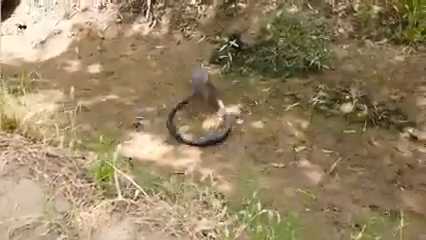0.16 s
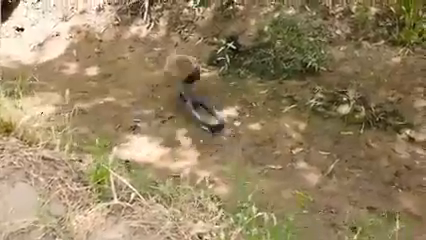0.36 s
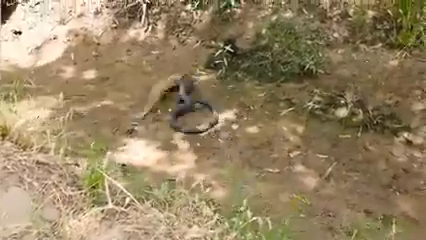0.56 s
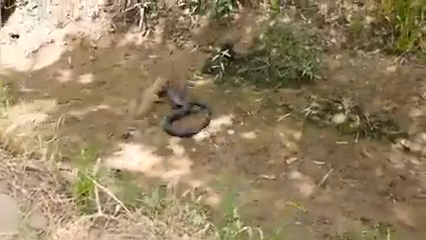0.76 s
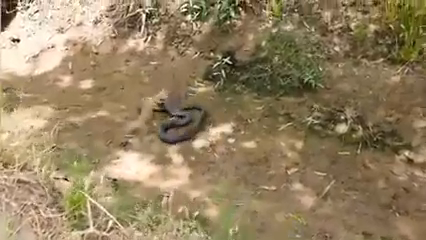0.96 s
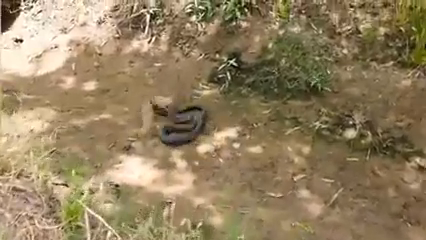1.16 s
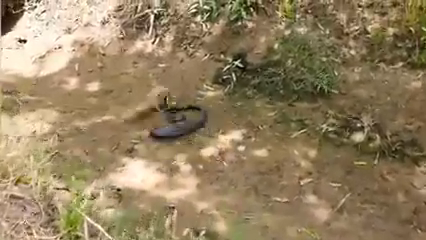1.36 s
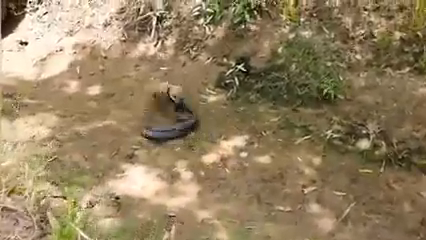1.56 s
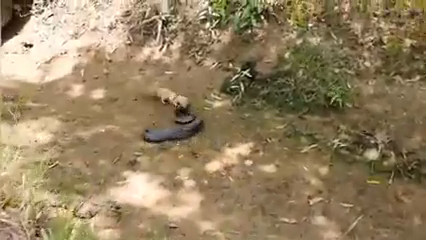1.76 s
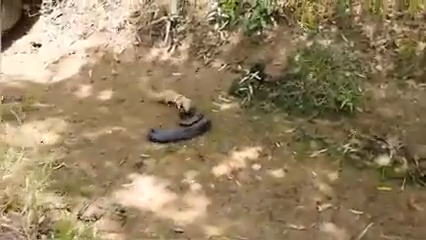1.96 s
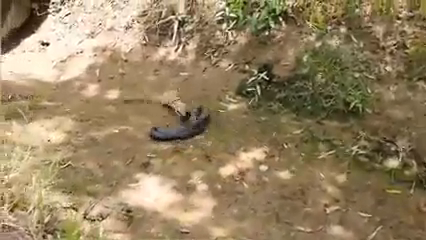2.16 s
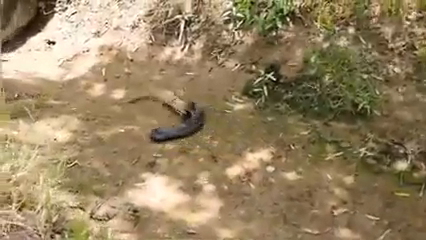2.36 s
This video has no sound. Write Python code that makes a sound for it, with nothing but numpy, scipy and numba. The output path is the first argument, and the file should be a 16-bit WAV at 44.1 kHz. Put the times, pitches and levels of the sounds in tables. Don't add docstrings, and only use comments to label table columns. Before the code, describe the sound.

Three forceful snake hisses, one sharp, one swelling, one long, over soft bumps, rustle and low wind

```python
import sys
import numpy as np
from scipy import signal
from scipy.fft import rfft, irfft
from scipy.io import wavfile
from scipy.ndimage import uniform_filter1d
from numba import njit

SR = 44100
rng = np.random.default_rng(int(sys.argv[2]) if len(sys.argv) > 2 else 0)


def field_ratio(decibels):
    return 10 ** (np.asarray(decibels, dtype=float) / 20)


def persist_wave(psi):
    counts = np.round(np.clip(psi, -1, 1) * 32767).astype(np.int16)
    wavfile.write(sys.argv[1], SR, np.atleast_2d(counts).T)


N = 112455


def unit(x):
    return x / np.sqrt(np.mean(x ** 2))


def curve(table, column=1):
    table = np.array(table)
    return np.interp(np.arange(N) / SR, table[:, 0], table[:, column])


def spectrum(table):
    table = np.array(table)
    hz = np.arange(N // 2 + 1) * SR / N
    return np.interp(np.log(hz + 1), np.log(table[:, 0]), table[:, 1])


def cut(x, hz, kind, order=6):
    return signal.sosfilt(signal.butter(order, hz, kind, fs=SR, output="sos"), x)


@njit
def svf(x, hz, width):
    y, b, l = np.empty(len(x)), 0., 0.
    for i in range(len(x)):
        g, k = np.tan(np.pi * hz[i] / SR), width / hz[i]
        v = (b + g * (x[i] - l)) / (1 + g * (g + k))
        b, l, y[i] = 2 * v - b, l + 2 * g * v, k * v
    return y


def resonance(hz, width_hz, size=N):
    hz = np.clip(hz * np.ones(size), 20, .42 * SR)
    once = svf(rng.standard_normal(size), hz, 1. * width_hz)
    return svf(once, hz, 1.5 * width_hz)


def band(hz, width_hz):
    return resonance(hz, width_hz) / np.sqrt(width_hz / SR)


def walk(rate_hz):
    k = int(SR / rate_hz)
    steps = np.repeat(rng.standard_normal(1500), k)[:N]
    return unit(uniform_filter1d(uniform_filter1d(steps, k), k))


# start_s, level_db, length_s, left_right_db
GUSTS = [(0, -35.5, 0.012, -4), (0.551, -40, 0.024, -6), (0.759, -48.5, 0.027, -13.5),
         (1.688, -34.5, 0.028, -28), (1.76, -40.5, 0.058, -25), (1.864, -22.5, 0.017, -34),
         (1.949, -31.5, 0.045, -27), (2.055, -30.5, 0.055, -4.5), (2.114, -29, 0.029, 3.5),
         (2.212, -44.5, 0.098, -16), (2.391, -26.5, 0.012, -18), (2.429, -35, 0.019, -11),
         (2.513, -46, 0.027, 9)]


def wind():
    breeze_db, buffet_db, buffet_hz = -44.5, 2, 14
    t, out = np.arange(N) / SR, []
    for side in (1, -1):
        gust = 0
        for s, db, length, pan_db in GUSTS:
            level_db = db + np.minimum(side * pan_db, 0) + 4
            gust = gust + field_ratio(level_db) * np.exp(-((t - s) / length) ** 2)
        low = unit(cut(band(66.5, 49) + field_ratio(-6.5) * band(34, 25), 111, "low", order=4))
        edge = unit(cut(band(120, 120), 206, "low", order=4))
        low_gain = field_ratio(breeze_db) + gust
        edge_gain = field_ratio(breeze_db - 17) + field_ratio(3.5) * gust ** 1.52
        out.append(field_ratio(buffet_db * walk(buffet_hz)) * (low_gain * low + edge_gain * edge))
    return np.array(out)


# pitch_hz, level_db (per Hz)
AIR_TONE = [(150, -24), (230, -10), (400, -9), (900, -13.5), (1900, -13), (4000, -24.5), (5570, -23),
            (7500, -32)]
# time_s, level_db
AIR_LEVEL = [(0, -58.5), (.5, -61), (.6, -57.5), (.7, -63.5), (.8, -58), (1.5, -58), (2.32, -54.5),
             (2.4, -63), (2.46, -54), (2.55, -60)]


def air():
    alike = 0.58
    noise = rng.standard_normal((3, N))
    pair = alike * noise[0] + noise[1:]
    toned = irfft(rfft(pair) * field_ratio(spectrum(AIR_TONE)), N)
    return unit(toned) * field_ratio(curve(AIR_LEVEL) + 0.64 * walk(4.8))


# time_s, level_db
BROAD_NOISE_LEVEL = [(.09, -66), (.115, -57), (.18, -57), (.56, -52), (.66, -78), (1.4, -45.5), (1.46, -53),
                     (1.6, -57.5), (1.64, -37), (1.72, -42.5), (2.3, -47), (2.37, -63.5)]
# pitch_hz, width_hz, level_db
BROAD_NOISE_BANDS = [(2320, 2500, -8), (6730, 3900, -7), (12800, 4500, -5)]


def broad_noise():
    pair = [sum(field_ratio(db) * band(hz, width) for hz, width, db in BROAD_NOISE_BANDS) for _ in range(2)]
    return field_ratio(curve(BROAD_NOISE_LEVEL) + 1.2 * walk(15.0)) * np.array(pair)


def puff():
    start_s, length_s, level_db = .14, 0.026, -54.5
    t = np.arange(N) / SR
    return field_ratio(level_db) * np.exp(-((t - start_s) / length_s) ** 2) * band(3750, 700)


# time_s, breath_db, front_cavity_hz, front_cavity_db, brightness_db, gape_stretch
STRIKE = [(0.18, -17.5, 2220, -4, 4, 1.186), (.25, -22, 1950, -3, 3, 1.164),
          (0.301, -26, 2400, -8, 3.5, 0.92), (.35, -18.5, 3170, 4.5, 3, 1.055),
          (0.374, -26, 3230, -8, 0, 0.92), (0.38, -23, 1920, -13.5, 2.3, 1.03),
          (0.453, -24, 2090, 9.5, -2.5, 0.99), (0.481, -28.5, 3130, 11.5, -3, 0.81),
          (0.533, -31, 2600, 7, -11, 0.63)]
WARNING = [(0.861, -37, 2100, -9, -4, 1.7), (0.892, -24, 1826, 0.5, -6.5, 0.75),
           (1.05, -27, 1910, 3.5, 3, 1.06), (1.2, -26, 1800, 2.5, 4, 1.13),
           (1.302, -20, 1900, -6.5, 0, 0.92), (1.331, -18.5, 2800, 4.5, -0.5, 0.95),
           (1.391, -15, 2740, -6, -3.5, 0.98), (1.424, -14.5, 2110, 0, -31, 0.57),
           (1.432, -40.5, 2210, 10, -8, 0.74)]
LAST = [(1.626, -42.5, 1920, 0, -8.5, 1.25), (1.711, -29, 1970, 7.5, -8.5, 0.98),
        (1.736, -22.5, 2020, 17, -1, 1.06), (1.748, -28.5, 1860, 2.5, -4.5, 0.93),
        (1.87, -24.5, 1950, 3.5, -5.5, 0.973), (2.0, -23.5, 1900, 2, -8, 0.98),
        (2.071, -22, 1840, 8.5, -2, 1.03), (2.272, -26, 1764, 10.5, 2.5, 0.96),
        (2.293, -46, 1920, 10, -1, 1.1)]
# pitch_hz, width_hz, level_db
MOUTHS = [
    [(1900, 730, -5), (3620, 930, 1.5), (5800, 3800, -6.5), (7550, 5400, -7.5), (12600, 8400, -7),
     (15800, 3500, -11.5)],
    [(2600, 1140, -9), (3440, 880, -10), (7200, 8100, -14), (8900, 1000, -18), (11600, 5300, -7),
     (15000, 2300, -4.5)],
    [(1580, 305, -2), (2475, 550, -2), (3620, 350, -13), (6000, 3030, -10), (8030, 2000, -6),
     (9450, 3800, -16), (13730, 1300, -6.5)],
]
# time_s, palate_hz, palate_db, fang_whistle_hz, fang_whistle_db
UPPERS = [
    [(.18, 5900, 8.5, 12000, -6.5), (.205, 6300, 1, 12300, -4.5), (.23, 7600, 4.5, 13000, -4),
     (.27, 7000, -14, 12000, -8.5), (.3, 7400, 10, 13200, 9.5), (.37, 7800, -11, 12500, -7.5),
     (.4, 6900, -17, 12000, -9), (.47, 7000, 2, 12000, -12.5), (.53, 6600, -3, 12000, -19)],
    [(.87, 7000, -14, 12300, -17), (.96, 7600, -3.5, 12600, -19), (1.1, 7200, -10.5, 12000, -6),
     (1.2, 7700, -0.5, 12000, -2), (1.27, 7800, -4.5, 12900, 4.5), (1.345, 8600, -2.5, 13600, 3),
     (1.37, 7200, -5.5, 13000, -2), (1.41, 6400, -1.5, 12800, -12), (1.43, 6300, -21, 12500, -32)],
    [(1.63, 5400, -19, 11000, -28), (1.73, 5800, -2, 11000, -20), (1.82, 6000, -6, 11000, -9),
     (1.85, 7400, -6, 11200, -16), (1.95, 7000, -8.5, 11400, -8.5), (2.07, 7700, -7, 11400, -10),
     (2.17, 6950, -3, 11900, -1), (2.27, 7000, 2.5, 12600, 1), (2.29, 7000, -21, 12600, -11)],
]
# low_cut_hz, side_pocket_null_hz, null_depth (0-1), windpipe_db
THROATS = [
    (1240, 4200, 0.8, 0.5),
    (1595, 5750, 0.8, 2),
    (1396, 4200, 0.06, -3),
]
# pitch_hz, width_hz, level_db
WINDPIPE = [(450, 172, -20.5), (760, 430, -23)]


def hiss(table, mouth, upper, cut_hz, null_hz, depth, pipe_db):
    attack_db_s, release_db_s = 6023, 1082
    front_width_hz, palate_width_hz, fang_width_hz, null_width_hz = 317, 1670, 2800, 350
    pivot_hz, patchy_db, patchy_hz = 2800, 2, 18
    t = np.arange(N) / SR
    first_s, last_s = table[0][0], table[-1][0]
    on = slice(int(SR * round(first_s, 1)) - 4000, int(SR * round(last_s, 1)) + 8000)
    size = on.stop - on.start

    def patchy(db):
        return field_ratio(db + patchy_db * walk(patchy_hz)[on])

    bright = curve(table, column=4)[on]
    stretch = np.clip(curve(table, column=5)[on], .7, 1.4)
    front_hz, front_db = curve(table, column=2)[on], curve(table, column=3)[on]
    jet = field_ratio(front_db) * resonance(front_hz, front_width_hz, size)
    for k, width in ((1, palate_width_hz), (3, fang_width_hz)):
        hz, db = curve(upper, column=k)[on], curve(upper, column=k + 1)[on]
        jet += patchy(db) * resonance(hz, width, size)
    for k, (hz, width, db) in enumerate(mouth):
        tilt_db = bright * np.log2(hz / pivot_hz)
        moved_hz = hz * stretch ** min(k, 1)
        jet += patchy(db + tilt_db) * resonance(moved_hz, width, size)
    jet = jet - np.clip(depth, 0, 1) * svf(jet, null_hz * stretch, 1. * null_width_hz)

    held_db = 0.95 * np.clip(curve(table)[on] + 26, 0, 20)
    pipe = 0
    for hz, width, db in WINDPIPE:
        pipe = pipe + patchy(db + 6.5 + pipe_db - held_db) * resonance(hz, width, size)

    attack_db = attack_db_s * np.clip(first_s - t, 0, .1)
    release_db = release_db_s * np.clip(t - last_s, 0, 1)
    flutter_db = 0.5 * walk(46.12)
    out = np.zeros(N)
    out[on] = cut(jet, cut_hz, "high", order=7) + cut(pipe, (300, 751), "band", order=3)
    return 3.22 * out * field_ratio(curve(table) - attack_db - release_db + flutter_db)


# start_s, peak_db, ring_hz, ring_length_s, crack_db
KNOCKS = [(0.201, -30.5, 540, 0.0066, -13), (.235, -40.5, 485, 0.028, -56.5),
          (0.393, -22.5, 634, 0.00069, -25), (0.547, -29, 228, 0.0019, -41), (0.572, -33, 550, 0.0022, -16),
          (0.63, -28.5, 457, 0.0077, -16.5), (0.7381, -37, 2095, 0.0014, 4.5),
          (0.493, -41, 800, 0.0074, -42), (0.616, -36, 450, .006, -43), (0.627, -50, 1500, .001, -8.5),
          (.773, -46, 890, 0.0014, -6), (.805, -55, 2800, .001, -1), (1.361, -36.5, 1080, 0.0097, -31),
          (0.77, -40.5, 886, 0.0008, -9.5)]


def knocks():
    t, out, grit = np.arange(N) / SR, 0, rng.standard_normal(N)
    for s, db, hz, length, crack_db in KNOCKS:
        ring = np.exp(-((t - s) / (0.7 * length)) ** 2) * np.sin(2 * np.pi * hz * (t - s))
        crack = grit * (t > s) * np.exp(-np.abs(t - s) / 0.0004)
        out = out + field_ratio(db) * (ring + field_ratio(crack_db) * crack)
    return out


def scrape():
    start_s, length_s, level_db = 1.625, .06, -41
    t = np.arange(N) / SR
    shape = (t > start_s) * np.exp(-((t - start_s) / length_s) ** 4)
    return field_ratio(level_db + 1.2 * walk(180)) * shape * band(700, 1600)


# pitch_hz, level_db
SCATTER = [(1200, -18), (2200, -8), (3600, 2), (5200, 0), (7200, 0), (9500, 6), (12000, 1), (15500, 4)]
# time_s, depth (0-1)
CANCEL = [(.2, 0.78), (.45, 0.48), (.87, .6), (1.05, 0.6), (1.28, 1), (1.32, .97), (1.38, .97), (1.39, 0.5),
          (1.8, 0.4), (2.1, 0.65), (2.3, 0.2)]


def scatter(snake):
    ground_db, ground_t60_s, grass_t60_s = -22, .12, .035
    cancel_hz, cancel_width_hz = 4850, 2600
    t = np.arange(int(.4 * SR)) / SR
    ground = rng.standard_normal((2, len(t))) * 1000. ** (-t / ground_t60_s)
    turn = np.pi / 2 * walk(7)
    grass = rng.standard_normal((2, 2, len(t))) * 1000. ** (-t / grass_t60_s)
    high = irfft(rfft(snake) * field_ratio(spectrum(SCATTER)), N)
    cancelled = svf(high, cancel_hz + 250 * walk(7.1), 1. * cancel_width_hz)
    high = high - np.clip(curve(CANCEL), 0, 1) * cancelled
    out = []
    for near, tail in zip(grass, ground):
        echo = field_ratio(ground_db) * signal.fftconvolve(snake, unit(tail) / np.sqrt(len(t)))[:N]
        for path, part in zip(near, (np.cos(turn), np.sin(turn))):
            echo = echo + signal.fftconvolve(high * part, unit(path) / np.sqrt(2 * len(t)))[:N]
        out.append(echo)
    return out


# pitch_hz, level_db
LEFT_PORT = [(800, -2), (1500, 1), (2600, 5), (4700, 2.5), (7600, 2), (9800, -4), (12500, -1),
             (15300, -8.5)]
RIGHT_PORT = [(800, -2.5), (1500, -5), (2600, -6.5), (4000, 4.5), (6500, -8.5), (8500, -9), (10200, -4.5),
              (15000, -6)]
# pitch_hz, phase_rad
LEFT_LEAD = [(300, 0), (1550, 0.84), (2580, 0.4), (4550, -3), (7060, -4), (8870, -5.5), (10300, -7),
             (15500, -12.5)]


def ports(snake, ticks):
    left, right = scatter(snake)
    direct = snake + ticks
    lead = np.exp(.5j * spectrum(LEFT_LEAD))
    level = 1 / np.sqrt(1 + field_ratio(spectrum(SCATTER)) ** 2 / 2)
    left = rfft(direct + left) * level * field_ratio(spectrum(LEFT_PORT)) * lead
    right = rfft(direct + right) * level * field_ratio(spectrum(RIGHT_PORT)) / lead
    return np.array([irfft(left, N), irfft(right, N)])


def scene():
    snake = 0
    for table, mouth, upper, throat in zip((STRIKE, WARNING, LAST), MOUTHS, UPPERS, THROATS):
        snake = snake + hiss(table, mouth, upper, *throat)
    ticks = puff() + knocks() + scrape()
    return ports(snake, ticks) + broad_noise() + wind() + air()


def low_pass(x):
    return signal.sosfilt(signal.butter(12, 16650, fs=SR, output="sos"), x)


def record(dry):
    top_cut = signal.ellip(12, .3, 80, 15750, fs=SR, output="sos")
    mix = signal.sosfilt(top_cut, np.clip(dry, -1, 1))
    return low_pass(mix)


dry = scene()
out = record(dry)
persist_wave(out)
```